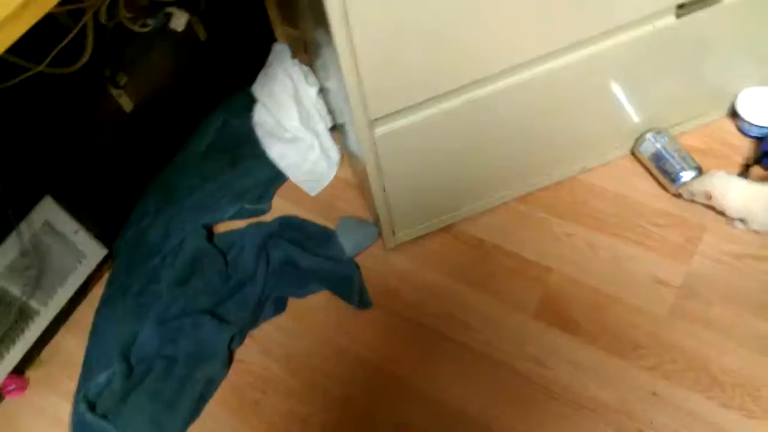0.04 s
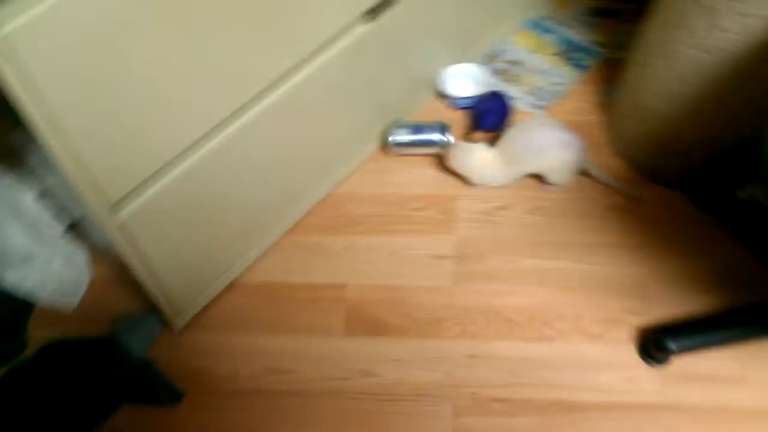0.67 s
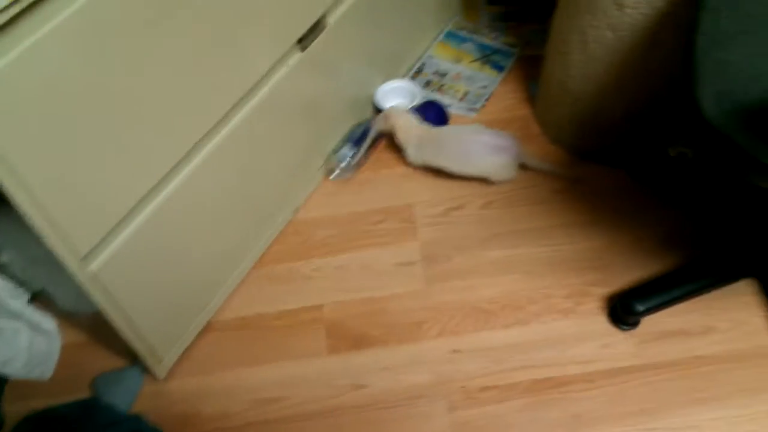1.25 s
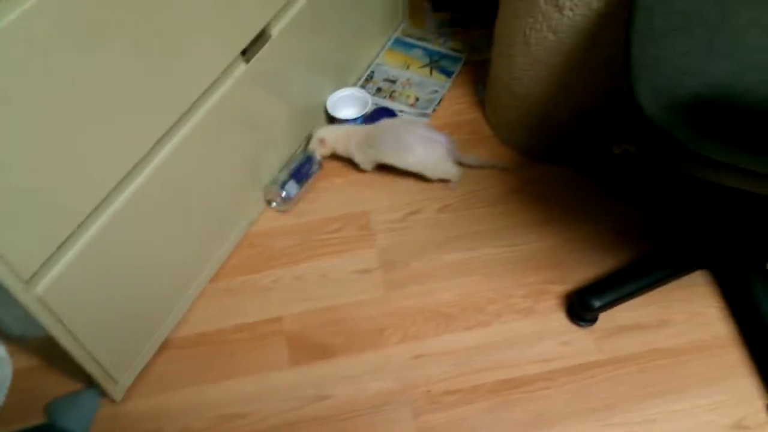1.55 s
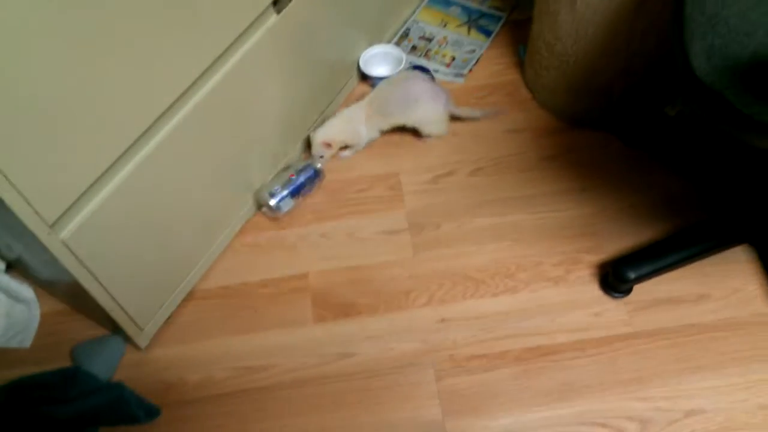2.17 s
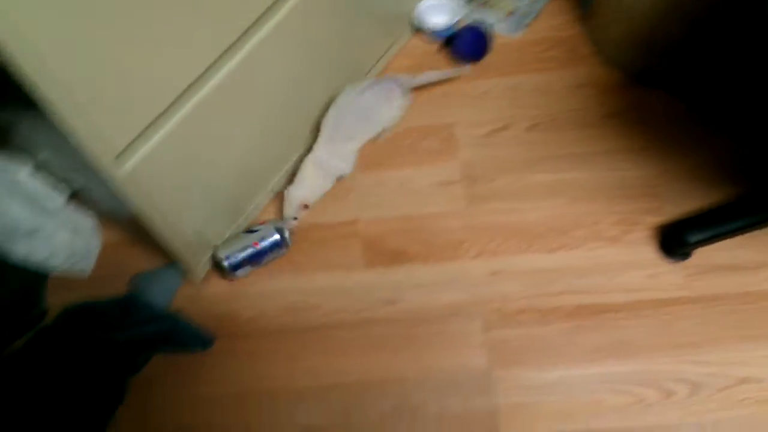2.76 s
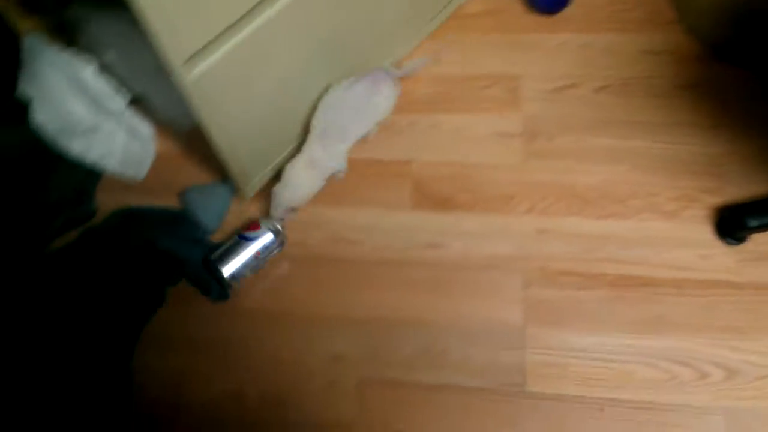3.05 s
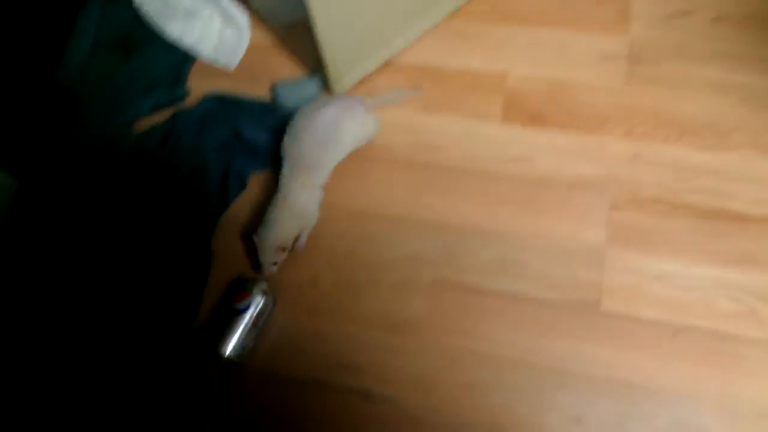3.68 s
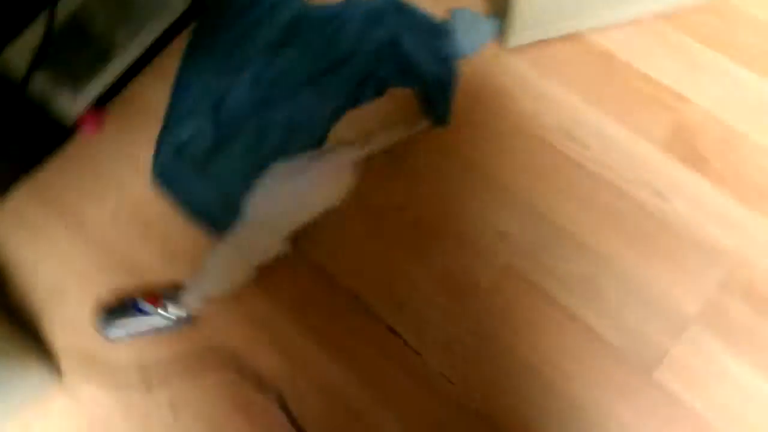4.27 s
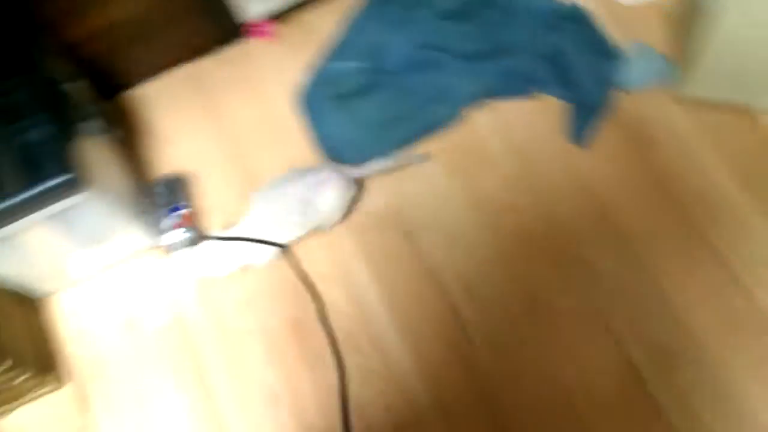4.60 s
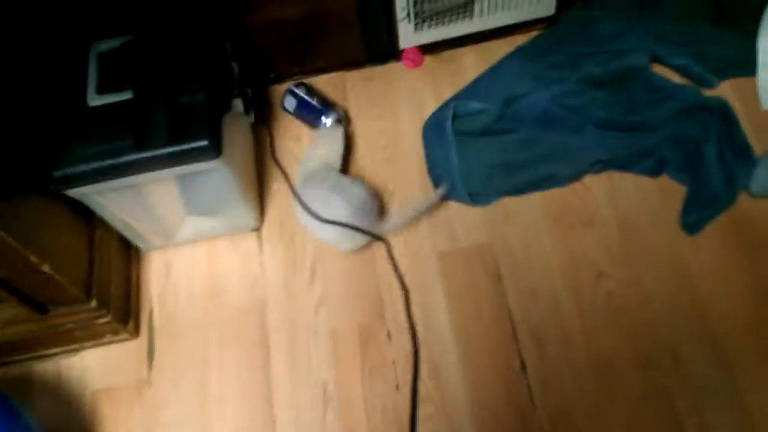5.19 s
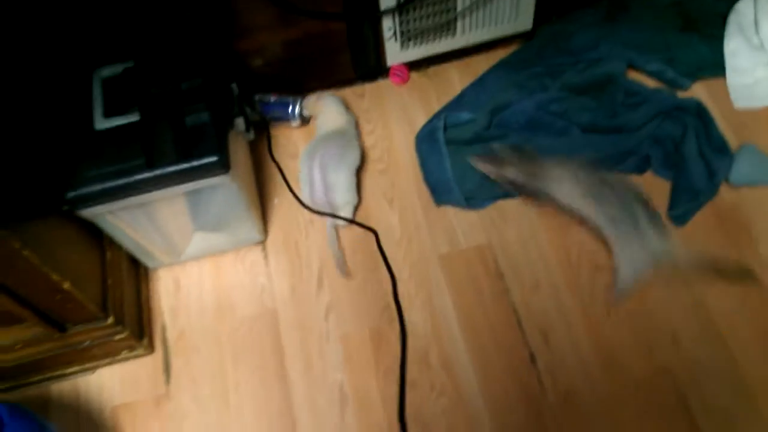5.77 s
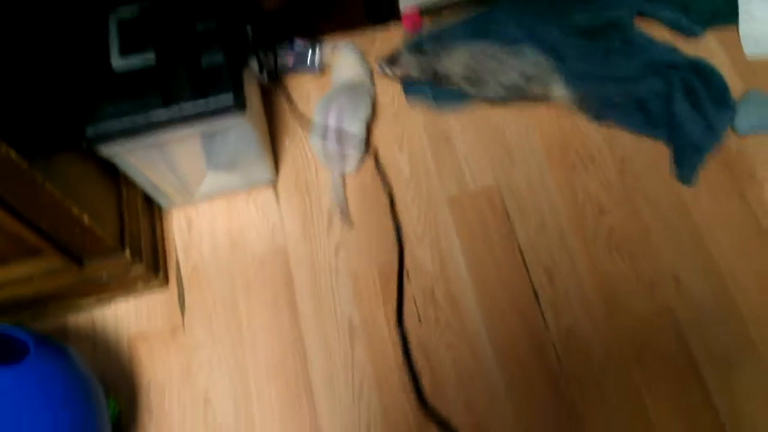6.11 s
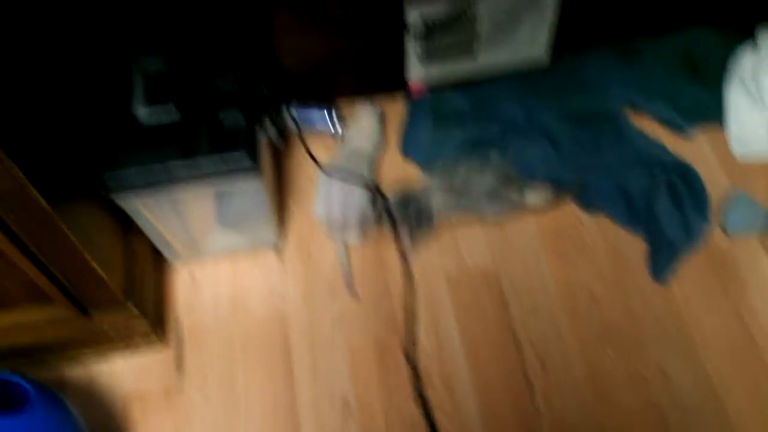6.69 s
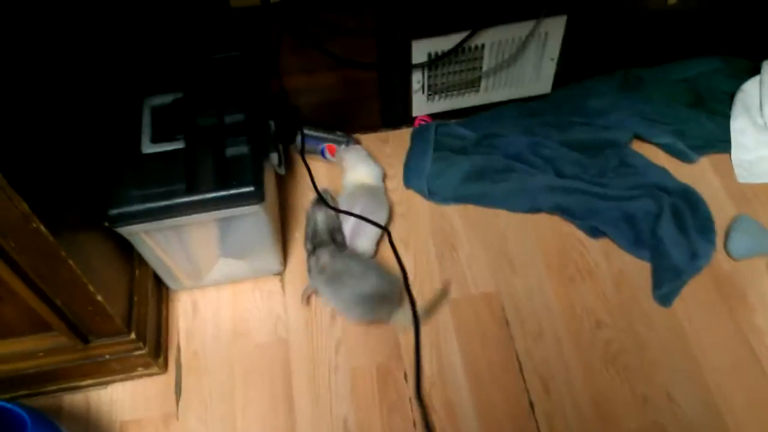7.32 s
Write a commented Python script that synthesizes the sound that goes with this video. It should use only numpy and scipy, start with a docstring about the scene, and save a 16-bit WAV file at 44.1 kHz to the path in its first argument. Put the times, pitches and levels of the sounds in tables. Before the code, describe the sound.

A ferret tugs an empty metal can over laminate flooring, with uneven scrapes, hollow clinks and bumps against furniture.

```python
"""In a small, faintly humming room, a ferret tugs an empty aluminium can across a laminate floor.
A hand-held camera ticks, and at 0.5 s the can drops: its thin wall pops, its shell rings, the boards thud.
It scrapes along between knocks, bumps into furniture near 2.9 s, then rocks and chatters from end to end.
From 5.2 s it knocks about beside a hollow plastic box, which booms when the can lands flat against it.
The camera ticks again just before the last skid. Movement on the floor rumbles softly all the way through."""
import sys
import numpy as np
from scipy import signal
from scipy.fft import rfft, irfft, next_fast_len
from scipy.io import wavfile

SR = 44100
rng = np.random.default_rng(int(sys.argv[2]) if len(sys.argv) > 2 else 0)


def bounce(signal):
    """Save signal as a 16-bit WAV file at the path given by the first command-line argument."""
    frames = np.transpose(np.atleast_2d(signal))
    limited = np.clip(frames, -1, 1)
    pcm = np.round(limited * 32767).astype(np.int16)
    wavfile.write(sys.argv[1], SR, pcm)


N = 328545
TIME = np.arange(N) / SR
BLOW_TIME = np.arange(SR // 2) / SR  # the half second in which one blow dies away
BLOW_HZ = np.fft.rfftfreq(len(BLOW_TIME), 1 / SR)
THUD_TOP_HZ, SHELL_TOP_HZ = 507, 2686  # where thud gives way to shell ring, and shell ring to rim clink

# Levels in the tables are relative: the functions add their own gains.
# each knock of the can: start_s, contact, level_db, pitch_hz (the pitch it favours)
KNOCKS = [(.069, "wall", -48.5, 1790), (0.5059, "flat", -23.5, 1760), (0.509, "nudge", -28, 375),
          (.606, "rim", -38.5, 4630), (0.752, "wall", -31, 1920), (.754, "nudge", -24.5, 404),
          (.8, "wall", -31, 2020), (.839, "ring", -32, 2050), (.856, "ring", -38.5, 2070),
          (.911, "bump", -42.5, 550), (.926, "thump", -46, 226), (1.124, "edge", -29.5, 4050),
          (1.137, "ring", -37, 2170), (1.14, "nudge", -27, 360), (1.194, "ring", -36, 1980),
          (1.5, "rim", -29.5, 4200), (1.565, "wall", -32, 1870), (1.612, "crack", -32, 4500),
          (1.614, "wall", -26.5, 1790), (1.6676, "rock", -24.5, 1410), (2.0315, "nudge", -30, 376),
          (2.067, "rim", -36, 3540), (2.141, "crack", -34, 5430), (2.144, "wall", -28, 1980),
          (2.376, "crack", -34.5, 3300), (2.377, "wall", -23.5, 1990), (2.52, "wall", -29, 1930),
          (2.556, "wall", -31, 2000), (2.571, "nudge", -26, 384), (2.646, "nudge", -31, 517),
          (2.682, "crack", -18.5, 4930), (2.755, "edge", -29.5, 3580), (2.86, "skid", -26.5, 7660),
          (2.892, "skid", -20.5, 7050), (2.907, "bump", -16, 320), (3.034, "rock", -29, 1200),
          (3.162, "rim", -28, 4800), (3.274, "rock", -17, 1700), (3.3021, "rock", -18.5, 1590),
          (3.3239, "rock", -22, 1800), (3.341, "rock", -23.5, 1500), (3.362, "edge", -30, 700),
          (3.425, "edge", -28, 4670), (3.481, "rock", -25, 960), (3.5, "rim", -30, 4730),
          (3.5228, "rock", -27, 1280), (3.682, "bump", -34, 450), (3.8304, "rock", -23, 860),
          (3.8762, "rock", -17, 950), (3.9104, "rock", -19.5, 900), (3.9363, "rock", -22, 1200),
          (3.9569, "rock", -25, 1000), (3.9707, "rock", -22.5, 970), (4.111, "rock", -25, 780),
          (4.1489, "rock", -22, 760), (4.1815, "rock", -26, 760), (4.207, "rock", -26, 744),
          (4.225, "rock", -30.5, 660), (4.332, "rock", -32, 760), (4.428, "rock", -30, 900),
          (4.4823, "flat", -24, 850), (4.508, "crack", -19.5, 5200), (4.511, "bump", -23, 372),
          (4.589, "nudge", -28.5, 380), (4.638, "rim", -30, 5700), (4.788, "skid", -42, 9000),
          (4.874, "skid", -34, 9000), (4.963, "skid", -36, 6540), (5.071, "skid", -34.5, 8150),
          (5.285, "nudge", -35, 520), (5.35, "skid", -39.5, 8100), (5.4036, "flat", -16, 1530),
          (5.405, "nudge", -24, 513), (5.4134, "rock", -28, 1250), (5.416, "wall", -24.5, 1750),
          (5.534, "wall", -30.5, 1500), (5.5592, "bump", -18, 313), (5.573, "flat", -20, 1600),
          (5.925, "tink", -50.5, 3200), (5.957, "tink", -42, 3340), (6.016, "tink", -39, 3310),
          (6.017, "thump", -50.5, 265), (6.19, "wall", -28, 1900), (6.2638, "rock", -22.5, 1480),
          (6.329, "rock", -29.5, 880), (6.411, "edge", -30, 7000), (6.511, "nudge", -31.5, 480),
          (6.576, "nudge", -26, 410), (6.595, "nudge", -19.5, 2860), (6.653, "flat", -13.5, 2240),
          (6.663, "edge", -20, 3700), (6.673, "ring", -19, 2280), (6.816, "skid", -37, 8700),
          (6.906, "bump", -17, 322), (7.0108, "flat", -15.5, 1360), (7.278, "flat", -21, 1430),
          (7.3026, "rock", -21, 1310), (7.3801, "skid", -21, 6500), (7.3911, "tink", -24, 4100)]
# ways to strike, such as "flat" (whole side lands), "rock" (tips over) or "bump" (hits furniture):
# contact -> pop_db, thud_db, shell_db, rim_db, crack_db, boost_db, width_octaves, decay_s
CONTACTS = {"flat": (16, -6, -0.5, -8, 0, 7, -0.94, 0.23), "wall": (1, -14.5, 1, -9, -3, 9, 0.8, 0.19),
            "ring": (-6, -25, 1.5, -21.5, -12, 19.5, 0.33, 0.3),
            "edge": (5.5, -8, -3, 4.5, 8, 14.5, 0.9, 0.28),
            "crack": (12.5, -17.5, -6, 1.5, 19, 10.5, 1.1, 0.43),
            "rim": (-30, -24, -24.5, 2.5, 2, 6, -1.4, 0.23),
            "skid": (-22, -19.5, -18.5, 3, 0.5, 7, 0.4, 0.31),
            "bump": (10, -0.5, -8.5, -4, -9, 10.5, 0.9, 0.37),
            "nudge": (-9.5, -6, -19.5, -10.5, -20, 12, 0.1, 0.66),
            "thump": (-6, 18, -4, -35, -30, 18, 0.5, 0), "tink": (-28, -20, -14.5, 3, -6, 15, -0.2, 0.1),
            "rock": (21.5, -18.5, -5, -11.5, -1.5, 13, 1.36, 0.28)}
# natural tones (modes) of the floorboard, the air in the can and its shell: pitch_hz, level_db, decay_s
CAN_MODES = [(234.6, 4.5, 0.18), (325.6, 1, 0.35), (393.8, 1, 0.18), (492.4, -1, 0.14), (585, -2, 0.2),
             (675.4, 4.5, 0.24), (741, -3.5, 0.36), (956, 0.5, 0.24), (1303, 2.5, 0.36), (1686, 1, 0.22),
             (1857, 6, 0.15), (1980, 6.5, 0.21), (3057, 3, 0.3), (3280, -0.5, 0.45), (3527, 1.5, 0.28),
             (5654, 4.5, 0.25)]
# how strongly can and floor give off each pitch: pitch_hz, level_db
CAN_SPECTRUM = [(50, -49.5), (100, -1), (160, -10.5), (320, -4.5), (600, -5), (900, -1.5), (1530, -4),
                (1980, 0), (2250, -5), (2800, -11), (3150, -2), (3950, -4.5), (5550, 2), (6600, -4.5),
                (8500, -1.5), (14000, -11.5)]
# how much later a pop reaches the right side than the left: time_s, delay_ms
RIGHT_DELAY = [(1, 0.0028), (4.1, 0.19), (5.2, 0.12), (7.4, 0.021)]
# one slide over the floor for each tug or skid: start_s, length_s, rasp_db, hiss_db
SLIDES = [(0.487, 0.17, -51.5, -39), (0.703, 0.066, -33, -34.5), (1.101, 0.016, -36, -31.5),
          (1.275, 0.13, -47, -43.5), (1.351, 0.041, -48, -33.5), (1.499, 0.018, -33.5, -45),
          (1.627, 0.069, -35, -42), (1.84, .06, -62.5, -48), (2.009, 0.064, -40, -37),
          (2.124, 0.1, -29.5, -35), (2.336, 0.15, -37, -29.5), (2.506, 0.53, -31, -39.5),
          (2.68, 0.27, -37, -27), (3.021, 0.17, -37, -30.5), (3.303, 0.21, -29, -33),
          (3.427, 0.12, -37, -28.5), (3.543, 0.22, -42.5, -33), (3.86, 0.2, -31, -28.5),
          (4.096, 0.21, -33.5, -29), (4.307, 0.31, -30, -30.5), (4.563, 0.12, -47, -36.5),
          (4.69, 0.3, -40, -31), (5.01, 0.16, -44, -37.5), (5.222, 0.09, -47.5, -41),
          (5.405, 0.16, -28, -36.5), (5.913, 0.18, -51, -50.5), (6.114, 0.23, -28.5, -33),
          (6.582, 0.049, -36, -20), (6.693, 0.072, -23, -53), (6.81, 0.17, -46, -39),
          (6.924, 0.063, -26, -23), (7.017, 0.094, -26.5, -32.5), (7.16, 0.37, -39.5, -38)]
# centre of the shell's rasp as the can tilts and turns: time_s, pitch_hz
RASP_PITCH = [(0.5, 1700), (2.5, 1930), (3.2, 1210), (4.3, 866), (5.3, 1505), (6.297, 1028), (6.7, 2180),
              (7.1, 1090)]
# centre of the rim's hiss, higher when only its edge touches the floor: time_s, pitch_hz
HISS_PITCH = [(3.5, 4400), (4.9, 9500), (6.2, 4700)]
# ticks of the camera body: start_s, level_db, pitch_hz, left_minus_right_db
CAMERA_TICKS = [(0.4538, -7.5, 4070, 22), (7.257, -5, 5820, 18)]
# tone of the room's steady hiss: pitch_hz, level_db
ROOM_SPECTRUM = [(30, -29), (76, -20), (103, -87.5), (223, -25), (1220, -29.5), (5600, -31.5),
                 (7500, -31.5), (14000, -37.5)]
# rise and fall of the rumble from footfalls and handling: time_s, level_db
RUMBLE_LEVELS = [(0.0, -55.5), (1.9, -49), (2.74, -42), (5.55, -44), (5.8, -56.5), (6.2, -46),
                 (7.45, -41.5)]
# tone of that rumble: pitch_hz, level_db
RUMBLE_SPECTRUM = [(30, -48.5), (55, 0.0), (85, -12.5), (200, -11.5), (450, -17.5), (2000, -67.5)]
# balance of the two microphones: pitch_hz, left_minus_right_db
MIC_BALANCE = [(100, -3.5), (400, 0.5), (1300, 0.3), (2300, 0), (4300, 7.5), (7900, 2.5), (14000, 9.5)]


def can_knocks(blow_s=0.023, at_box_s=5.2, box_db=-9):
    """Each knock pops the wall and rings floor, shell and rim; the kind of contact sets the mix."""
    out = np.zeros((2, N))
    for start_s, contact, level_db, pitch_hz in KNOCKS:
        pop_db, thud_db, shell_db, rim_db, crack_db, boost_db, octaves, decay_s = CONTACTS[contact]
        spectrum = touch_spectrum(uneven_db=6.2) * boost_near(pitch_hz, boost_db, octaves)
        thud, shell, rim = can_ring(spectrum, decay_s, modes_db=-5.5, early_db=4.5)
        if start_s > at_box_s and contact in ("flat", "thump"):
            thud = thud + undb(box_db) * box_boom()
        ring = undb(thud_db - 0.5) * thud + undb(shell_db + 1) * shell + undb(rim_db - 0.5) * rim
        snap = undb(pop_db - 6) * wall_pop(start_s) + undb(crack_db - 4) * rim_crack()
        add(out, start_s, undb(level_db) * (np.sqrt(blow_s * SR) * ring + snap))
    return out


def can_ring(spectrum, decay_s, modes_db, early_db, scatter_db=3, grip_detune=0.013, room_db=-14):
    """One touch sets can and floor ringing. Returns the low thud, middle shell ring and high rim clink."""
    mode_hz, mode_db, mode_decay_s = np.transpose(CAN_MODES)
    # every touch shares its force out differently, and the ferret's grip detunes the modes a little
    detune, angle, scatter = rng.standard_normal((3, len(mode_hz)))
    strength = undb(mode_db + scatter_db * scatter) * np.interp(mode_hz, BLOW_HZ, spectrum)
    strength *= rng.choice([-1, 1], len(mode_hz))
    phase = np.outer(2 * np.pi * mode_hz * (1 + grip_detune * detune), BLOW_TIME)
    right_shift = (angle * np.minimum(mode_hz / 1100, 2))[:, None]
    longest_s = max(decay_s, 0.05) + 0.06  # modes may outlast the contact's own decay a little
    fades = np.array([fade(min(seconds, longest_s)) for seconds in mode_decay_s])
    modes = strength @ (fades * np.sin([phase, phase + right_shift]))
    # crowded shell modes and first echoes die fast; a duller tail hangs on in the room
    early = spread_noise(spectrum) * undb(early_db) * fade(0.079)
    dull_spectrum = spectrum / np.hypot(1, BLOW_HZ / 7500)
    tail = spread_noise(dull_spectrum) * (fade(decay_s) + undb(room_db) * fade(0.29))
    attack = 1 - np.exp(-BLOW_TIME / 0.0004)
    sound = (unit_energy(early + tail) + undb(modes_db) * unit_energy(modes)) * attack
    thud = filtered(filtered(sound, 176, "high", order=3), THUD_TOP_HZ, "low", order=5)
    shell = filtered(filtered(sound, THUD_TOP_HZ, "high", order=4), 1.15 * SHELL_TOP_HZ, "low", order=8)
    rim = filtered(sound, SHELL_TOP_HZ, "high", order=8)
    return unit_energy(thud), unit_energy(shell), unit_energy(rim)


def touch_spectrum(uneven_db, cluster_hz=90, blend_hz=9000):
    """Each touch shakes some clusters of shell modes harder than others."""
    clusters = np.interp(BLOW_HZ / cluster_hz, np.arange(512), rng.standard_normal(512))
    clusters *= np.minimum(BLOW_HZ / THUD_TOP_HZ, 1)  # they fade out in the bass
    clusters /= np.hypot(1, BLOW_HZ / blend_hz)  # and blend together in the treble
    # a sharper or blunter edge changes the top octaves
    edge_db = rng.standard_normal() * np.log2(np.maximum(BLOW_HZ / 4500, 1))
    return gain_at(CAN_SPECTRUM, BLOW_HZ) * undb(uneven_db * clusters + edge_db)


def wall_pop(time_s, pitch_hz=1250, delay_s=0.00057):
    """The thin wall snaps in and out: one wave of pressure that reaches the left side first."""
    right_delay_s = curve_at(RIGHT_DELAY, time_s) / 1000
    phase = 2 * np.pi * pitch_hz * (BLOW_TIME - delay_s - np.array([[0], [right_delay_s]]))
    return -phase * np.exp((1 - phase ** 2) / 2)


def rim_crack(decay_s=0.008, band_hz=(2500, 9000)):
    """The first dry snap of metal on the floor: a tiny burst of bright noise."""
    return filtered(rng.standard_normal((2, len(BLOW_TIME))), band_hz, "band", order=1) * fade(decay_s)


def can_scrape(hops_per_s=45, hop_db=12, boards_db=-12, rasp_db=-2, hiss_db=-3.5):
    """As the can is dragged, its shell judders, its rim slips in finer jerks, and hops pop the wall."""
    out = np.zeros((2, N))
    judders = stick_slip(per_s=260, spread_db=3.0)
    slips = stick_slip(per_s=420, spread_db=3.5)
    hops = (rng.random(N) < hops_per_s / SR) * rng.uniform(0, 0.91, N) * undb(hop_db)
    rasp, hiss = slide_levels()
    pushes = np.array([judders * rasp, slips * hiss, hops * rasp])
    step = SR // 11  # the turning can gets a fresh tone 11 times a second
    for i in range(0, N, step):
        middle_s = (i + step / 2) / SR
        spectrum = touch_spectrum(uneven_db=5.2)
        spectrum *= boost_near(curve_at(RASP_PITCH, middle_s), boost_db=4.5, octaves=0.86)
        spectrum *= boost_near(curve_at(HISS_PITCH, middle_s), boost_db=4.5, octaves=0.7)
        thud, shell, rim = can_ring(spectrum, decay_s=0.14, modes_db=-9, early_db=2)
        voices = undb(rasp_db) * shell + undb(boards_db) * thud, undb(hiss_db) * rim, wall_pop(i / SR)
        for push, voice in zip(pushes, voices):  # every little push sounds its voice once
            add(out, i / SR, signal.fftconvolve(push[None, i:i + step], voice))
    return out


def stick_slip(per_s, spread_db):
    """The can sticks and lets go: jerks of uneven size at random moments."""
    jerks = (rng.random(N) < per_s / SR) * undb(spread_db * np.minimum(rng.exponential(size=N), 4))
    return jerks * rng.choice([-1, 1], N) / np.sqrt(np.mean(jerks ** 2))


def slide_levels(attack_s=0.046, sag_db_per_s=9, release_db_per_s=181, wobbles_per_s=25):
    """Loudness of rasp and hiss: each slide takes hold, slows and coasts out as the can wobbles."""
    power = np.zeros((2, N))
    for start_s, length_s, rasp_db, hiss_db in SLIDES:
        age_s = TIME[:SR]
        fall_db = sag_db_per_s * age_s + release_db_per_s * np.maximum(age_s - length_s, 0)
        shape = np.minimum(age_s / attack_s, 1) * undb(-fall_db)
        add(power, start_s, np.outer(undb([rasp_db, hiss_db]), shape) ** 2)
    wobble_db = np.interp(TIME * wobbles_per_s, np.arange(512), rng.standard_normal(512))
    return np.sqrt(power) * undb(wobble_db)


def box_boom(pitches_hz=(106, 178), levels_db=(0, -6), decay_s=0.22):
    """The wall of the plastic storage box flexes with two low tones when the can lands against it."""
    boom = undb(levels_db) @ np.sin(2 * np.pi * np.outer(pitches_hz, BLOW_TIME)) * fade(decay_s)
    return unit_energy(np.array([boom, boom]))


def camera_ticks(crack_s=0.0062, ring_s=0.021, ring_db=-14):
    """The camera's plastic body ticks close by on the left: a dry crack with a short ring."""
    out = np.zeros((2, N))
    for start_s, level_db, pitch_hz, left_minus_right_db in CAMERA_TICKS:
        crack = filtered(rng.standard_normal(len(BLOW_TIME)), [2500, 11000], "band", order=1) * fade(crack_s)
        tick = crack + undb(ring_db) * np.sin(2 * np.pi * pitch_hz * BLOW_TIME) * fade(ring_s)
        sides = undb([level_db, level_db - left_minus_right_db])
        add(out, start_s, np.outer(sides, tick / np.abs(tick).max()))
    return out


def room_background(hiss_db=-70, rumble_db=-6, hum_db=-62, hum_hz=56.5):
    """Faint hiss, a low hum and the rumble of footfalls and handling."""
    hz = np.fft.rfftfreq(2 * next_fast_len(N // 2 + 1), 1 / SR)
    hiss = np.sqrt(N) * unit_energy(spread_noise(gain_at(ROOM_SPECTRUM, hz))[:, :N])
    rumble = np.sqrt(N) * unit_energy(spread_noise(gain_at(RUMBLE_SPECTRUM, hz))[:, :N])
    rumble *= undb(rumble_db + curve_at(RUMBLE_LEVELS, TIME))
    hum = np.sin(2 * np.pi * hum_hz * TIME)
    return undb(hiss_db) * hiss + rumble + undb(hum_db) * hum


def spread_noise(spectrum, mic_spacing_m=0.12):
    """Noise from all sides: left and right are alike in the bass and unrelated in the treble."""
    size = 2 * (len(spectrum) - 1)
    alike = np.sinc(2 * np.fft.rfftfreq(size, 1 / SR) * mic_spacing_m / 343)  # sound travels 343 m/s
    mid, side = rfft(rng.standard_normal((2, size))) * np.sqrt([1 + alike, 1 - alike]) * spectrum
    return irfft([mid + side, mid - side], size)


def boost_near(centre_hz, boost_db, octaves):
    """The spot that touches the floor favours pitches near centre_hz."""
    return undb(boost_db * np.exp(-(np.log2((BLOW_HZ + 1) / centre_hz) / octaves) ** 2))


def undb(db):
    """Turn decibels into a multiplier."""
    return 10 ** (np.asarray(db) / 20)


def fade(decay_s):
    """A fade that falls by 60 dB in decay_s (2 ms at the shortest)."""
    return np.exp(-np.log(1000) * BLOW_TIME / max(decay_s, 0.002))


def unit_energy(sound):
    """Scale a stereo sound so that the average of its two sides has energy 1."""
    return sound / np.sqrt(np.sum(sound.mean(0) ** 2))


def filtered(sound, hz, kind, order):
    """Keep the lows, the highs or a band; a higher order cuts more steeply."""
    return signal.sosfilt(signal.butter(order, hz, kind, fs=SR, output="sos"), sound)


def curve_at(table, time_s):
    """Read between the rows of a time_s, value table."""
    return np.interp(time_s, *np.transpose(table))


def gain_at(table, hz):
    """Read a pitch_hz, level_db table at hz, as a multiplier."""
    pitch_hz, level_db = np.transpose(table)
    return undb(np.interp(np.log(hz + 1), np.log(pitch_hz), level_db))


def add(track, start_s, sound):
    """Mix a two-channel sound into the track at start_s."""
    i = int(np.clip(start_s * SR, 0, N - 1))
    track[:, i:i + sound.shape[1]] += sound[:, :N - i]


def scene():
    """Can, camera and room together."""
    return can_knocks() + can_scrape() + camera_ticks() + room_background()


def record(dry, top_hz=14100):
    """The left microphone is brighter; peaks past full scale are flattened; the highest treble is cut."""
    size = next_fast_len(N)
    tilt = np.sqrt(gain_at(MIC_BALANCE, np.fft.rfftfreq(size, 1 / SR)))
    heard = irfft(rfft(dry, size) * np.array([tilt, 1 / tilt]), size)[:, :N]
    treble_cut = signal.ellip(10, 0.2, 70, top_hz, fs=SR, output="sos")
    return signal.sosfilt(treble_cut, np.clip(heard, -1, 1))


dry = scene()
out = record(dry)
bounce(out)
```